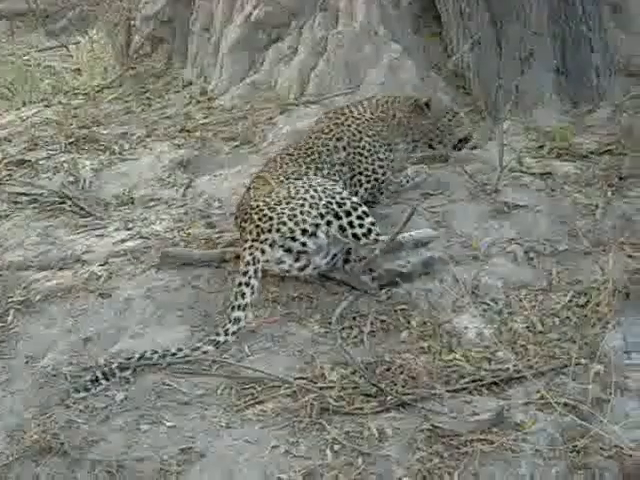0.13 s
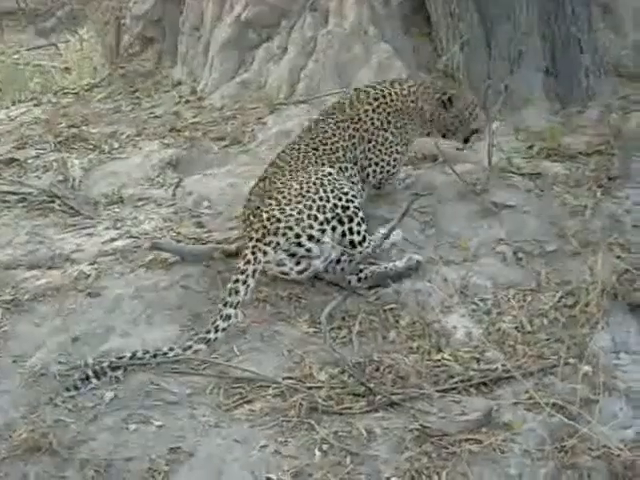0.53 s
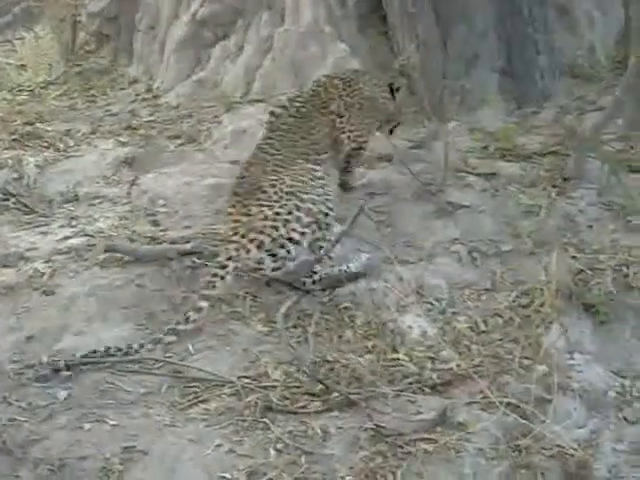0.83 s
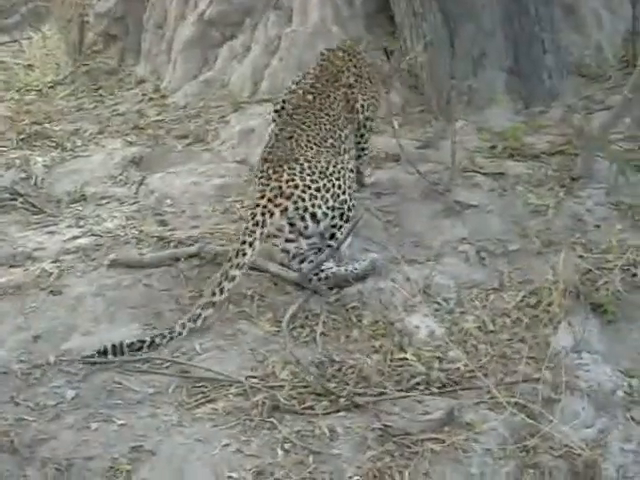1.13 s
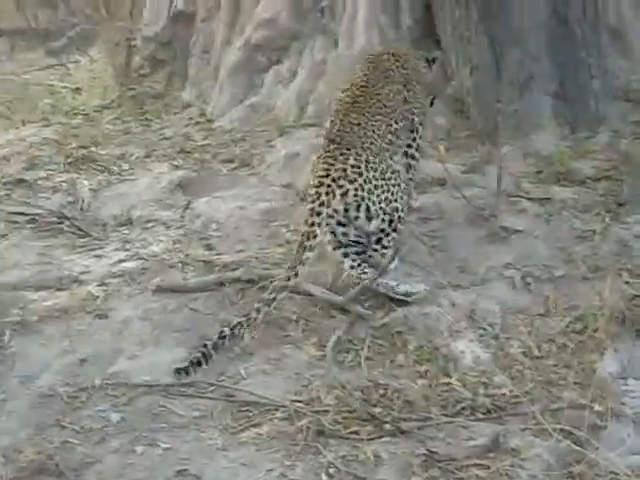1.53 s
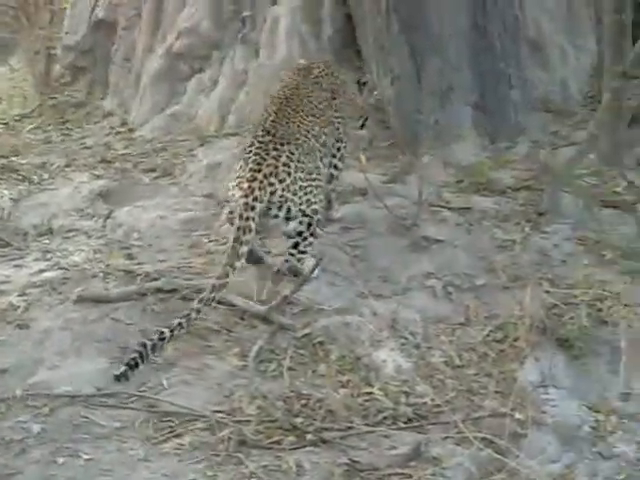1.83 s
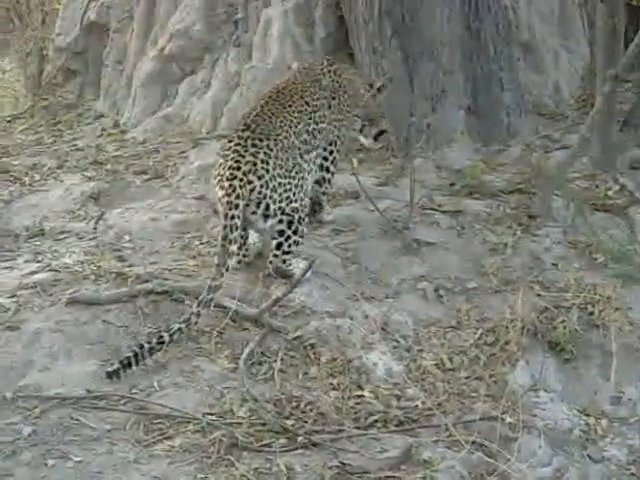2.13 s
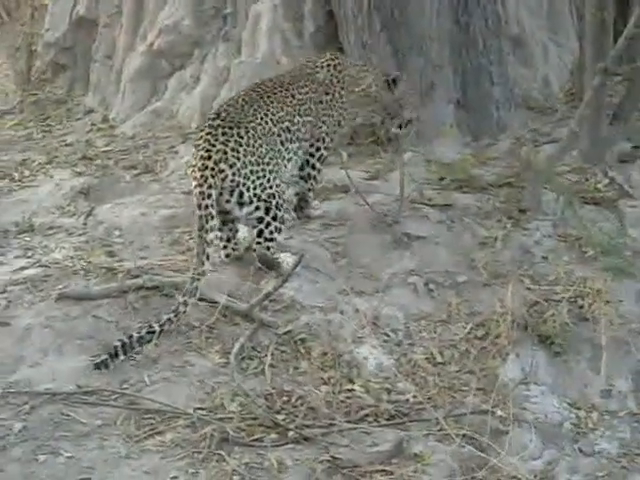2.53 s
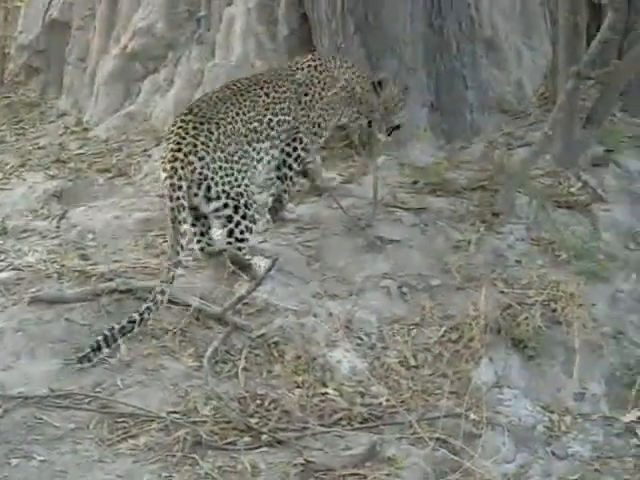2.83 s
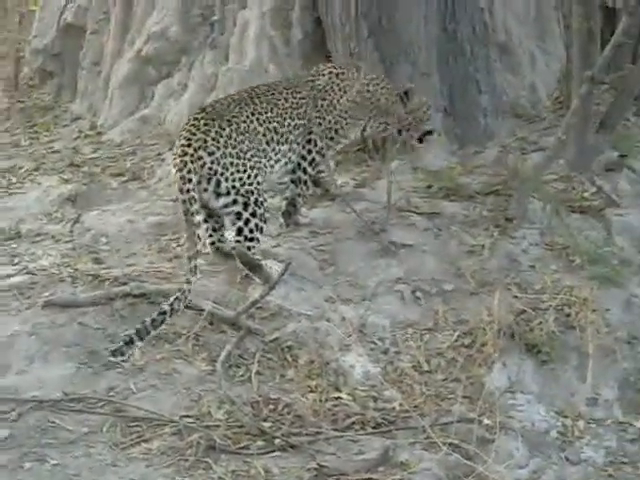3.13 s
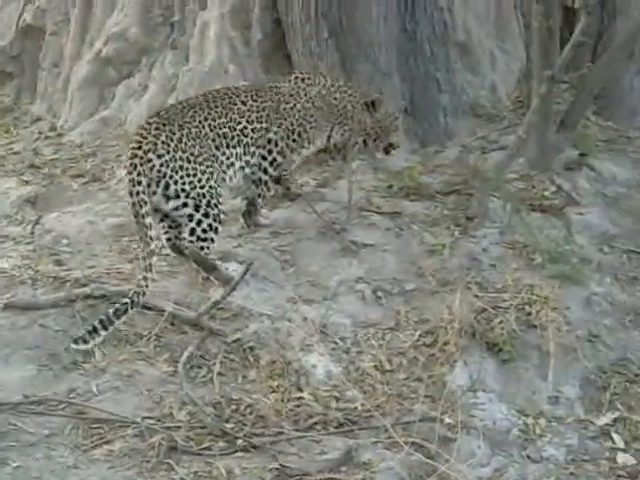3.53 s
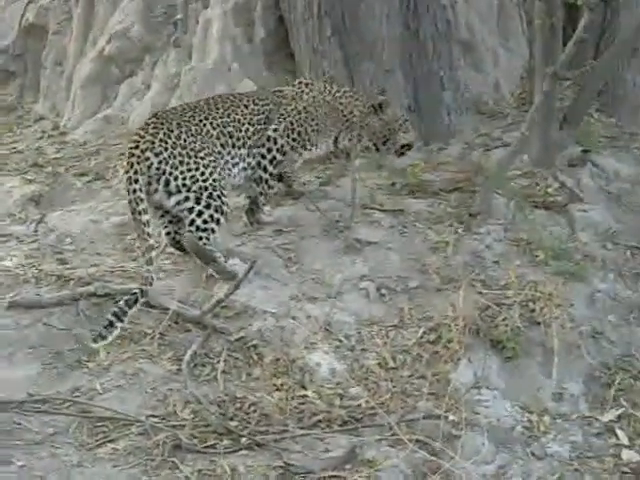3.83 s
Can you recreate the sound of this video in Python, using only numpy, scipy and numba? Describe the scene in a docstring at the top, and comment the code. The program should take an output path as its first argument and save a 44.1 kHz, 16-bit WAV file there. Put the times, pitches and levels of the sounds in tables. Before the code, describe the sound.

A leopard's rasping, sawing call, harsh out-breaths and in-breaths alternating steadily in quiet open bush.

```python
"""Open bush, a leopard sawing near a tree trunk: rough out-breaths and in-breaths by turns.
Slack vocal folds flap about 48 times a second on out-breaths and about 32, unevenly, on in-breaths.
Each flap is a click with a puff of noise after it; both ring drifting band-pass throat resonances.
Harsh rasps, lingering breath hiss and rumble, and decaying-noise echoes of trunk and far bush are added.
A narrow band cuts the treble and the strongest peaks are clipped."""
import sys
import numpy as np
from scipy import signal
from scipy.fft import rfft, irfft
from scipy.io import wavfile
from scipy.ndimage import uniform_filter1d
from numba import njit

SR = 44100
rng = np.random.default_rng(int(sys.argv[2]) if len(sys.argv) > 2 else 0)


def waveform_to_disk(signal):
    """Save audio, clipped to [-1, 1], as 16-bit WAV at the path in sys.argv[1]."""
    frames = np.transpose(np.atleast_2d(signal))
    scaled = np.clip(frames, -1, 1) * 32767
    samples = np.round(scaled).astype(np.int16)
    wavfile.write(sys.argv[1], SR, samples)


def undo_db(level):
    """Turn decibels back into plain size, where 20 dB means ten times bigger."""
    steps = np.asarray(level, float) / 20
    return 10 ** steps


N = 176400


def unit(x):
    """Scale to rms 1."""
    return x / np.sqrt(np.mean(x ** 2))


def coloured(points):
    """Noise of rms 1, its spectrum interpolated in dB over log frequency."""
    hz, db = np.array(points).T
    f = np.maximum(np.arange(N // 2 + 1) * SR / N, 1)
    gain = undo_db(np.interp(np.log(f), np.log(hz), db))
    return unit(irfft(rfft(rng.standard_normal(N)) * gain, N))


def walk(rate):
    """Slow random drift of rms 1: held draws, rate per second, smoothed twice."""
    k = int(SR / rate)
    held = np.repeat(rng.standard_normal(N // k + 1), k)
    return unit(uniform_filter1d(uniform_filter1d(held, k), k)[:N])


@njit
def resonance(x, hz, width, widen):
    """State-variable band-pass with a moving centre; widen damps its ringing."""
    y, b, l = np.empty(len(x)), 0., 0.
    for i in range(len(x)):
        g = np.tan(np.pi * hz[i] / SR)
        k = width * widen[i] / hz[i]
        v = (b + g * (x[i] - l)) / (1 + g * (g + k))
        b, l = 2 * v - b, l + 2 * g * v
        y[i] = v * width / hz[i]
    return y


# Noise spectrum of the bush. Each row: frequency in Hz, relative density in dB per Hz.
BUSH_SPECTRUM = [(24, -31), (40, -1), (360, -8), (754, -2), (1230, -3), (3700, -3), (4810, -33),
                 (8140, -120)]
BUSH_DB = -52


def bush():
    """Quiet steady background: coloured noise."""
    return undo_db(BUSH_DB) * coloured(BUSH_SPECTRUM)


def echoes(cat):
    """Reflections as decaying noise from 8 ms on: the near tree trunk and the bush farther off."""
    t = np.arange(SR) / SR
    tail = 0
    for db, t60_s in ((-14, .2), (-17, .51)):  # trunk, far bush
        decay = rng.standard_normal(SR) * np.exp(-np.log(1000) * t / t60_s) * (t > .008)
        tail = tail + undo_db(db) * unit(decay)
    return signal.fftconvolve(cat, tail / np.sqrt(SR))[:N]


# Noise spectrum of the breath's low rumble. Each row: frequency in Hz, relative density in dB per Hz.
RUMBLE_SPECTRUM = [(25, -17.5), (50, -4), (80, -2.5), (130, -18.5), (300, -62.5)]
HISS_DB, RUMBLE_DB, HISS_LAG_S = -21.5, -22, .055


def breath_hiss(cat):
    """Open-mouth hiss and rumble: noise on the lagged voice envelope, lingering between strokes."""
    pole = np.exp(-1 / (HISS_LAG_S * SR))
    envelope = signal.lfilter([1 - pole], [1, -pole], np.abs(cat))
    return envelope * (undo_db(HISS_DB) * coloured(BUSH_SPECTRUM) + undo_db(RUMBLE_DB) * coloured(RUMBLE_SPECTRUM))


# Single harsh rasps. Each row: start in seconds, resonance in Hz, width in Hz, decay in seconds, level in dB.
RASP_EVENTS = [(0.375, 1107, 89.4, 0.019, -22), (0.698, 2550, 199.6, .015, -22.5),
               (1.04, 2630, 358, 0.011, -22), (1.73, 572, 200, 0.02, -27.5),
               (2.888, 2650, 241, 0.0078, -17.5), (2.929, 2420, 207, 0.0047, -22.5),
               (2.815, 1083, 120, 0.017, -24.5)]


def rasps():
    """Short puffs of air, each ringing one resonance that rises a little."""
    out, t = np.zeros(N + SR), np.arange(SR // 5) / SR
    for start, hz, width, decay, db in RASP_EVENTS:
        puff = rng.standard_normal(len(t)) * np.exp(-t / decay)
        rising_hz = hz * (1 + np.minimum(t, 2 * decay))
        ring = resonance(puff, rising_hz, 1. * width, np.ones(len(t)))
        i = int(start * SR)
        out[i:i + len(t)] += undo_db(db) * ring / np.std(ring[t < decay])
    return out[:N]


FIRST_FLAP, FIRM_S = .35, .04  # strength at the start; it gains 1 per FIRM_S up to a ceiling of 1
SETTLE_S, PUFF_S = .03, .007  # time constants of the slow start and of the puff's decay


def flaps(breaths, pace, slow_end, scatter, scatter_db):
    """Irregular fold closures: clicks, puff envelopes, progress 0-1 per row, band dB, time since a flap."""
    clicks, progress, balance = np.zeros(N), np.zeros(N), np.zeros((5, N))
    t = np.arange(N) / SR
    for (start, length, *db), (rate, slow) in zip(breaths, pace):
        s = 0.
        for late, size in rng.standard_normal((24, 2)):
            if s < length and start + s < N / SR:
                firmness = min(FIRST_FLAP + s / FIRM_S, 1)
                clicks[int((start + s) * SR)] = undo_db(scatter_db * size) / np.sqrt(rate) * firmness
            slowing = slow * np.exp(-s / SETTLE_S) + slow_end * (s / length) ** 3
            s += (1 + slowing + scatter * late) / rate
        on = t >= start - .03
        progress[on] = np.clip((t[on] - start) / length, 0, 1)
        balance[1, on] = db[0] + (db[1] - db[0]) * progress[on]
        balance[2, on] = db[2] + (db[3] - db[2]) * progress[on]
        balance[3, on], balance[4, on] = db[4:]
    pole = np.exp(-1 / (PUFF_S * SR))
    onset = signal.lfilter([1], [1, -pole ** 3], clicks)
    puffs = signal.lfilter([1], [1, -pole], onset)
    since_s = t - np.maximum.accumulate(t * (clicks > 0))
    return unit(clicks), unit(puffs), progress, balance, since_s


WANDER, WANDER_DB, WANDER_PER_S = .03, 2.5, 14  # rms drift of pitch (share) and strength, draws per s
ARCH_TOP = (.25, .572, .28)  # progress at which chest, mouth, treble resonances stand highest
OPENING_S = .009  # damping grows from 0.5 to 1.5 times this after a flap


def strokes(breaths, efforts, throat, air_db, leak, sags, flap, damp):
    """Flaps and air ring groups of drifting throat resonances; parting folds damp the upper ones."""
    t = np.arange(N) / SR
    clicks, puffs, progress, balance, since_s = flaps(breaths, *flap)
    parted = 1 + damp * np.clip(since_s / OPENING_S - .5, 0, 1)
    effort = 0
    for points in efforts:
        at_s, level_db = np.array(points).T
        effort = effort + undo_db(np.interp(t, at_s, level_db, -120, -120))
    effort = uniform_filter1d(effort, size=90)
    out = 0
    # kind: 0 chest, 1 mouth, 2 treble; the last two groups are second chest and low mouth
    for group, band_db, kind in zip(throat, balance, (0, 1, 2, 0, 1)):
        arch = 1 - 2 * np.abs(progress - ARCH_TOP[kind])
        widen = parted if kind else np.ones(N)
        moving = []
        for hz, width, db in group:
            moving_hz = hz * (1 + sags[kind] * (arch - .4) + WANDER * walk(WANDER_PER_S))
            gain = undo_db(db + WANDER_DB * walk(WANDER_PER_S)) / np.sqrt(width)
            moving.append((moving_hz, 1. * width, gain))

        def ring(x):
            """Sum the group's resonances with alternating sign."""
            return sum((-1) ** k * g * resonance(x, hz, w, widen) for k, (hz, w, g) in enumerate(moving))

        air = unit((puffs + leak[kind]) * rng.standard_normal(N))
        source = clicks + undo_db(air_db[kind]) * air
        loudness = np.std(ring(source)[effort > effort.max() / 30])
        out = out + ring(effort * undo_db(band_db) * source) / loudness
    return out


# In-breath stretches; the first two rows are one breath, slower then faster flapping.
# Each row: first flap in seconds, length in seconds, mouth band early and late in dB,
# treble early and late in dB, second chest resonance in dB, low mouth resonance in dB; all against the chest.
IN_STRETCHES = [(.299, 0.11, -8.5, 6, -7.5, -17, -5, -15), (.439, 0.18, 1.5, 11.5, -10, -14.5, -6.5, -13),
                (.870, 0.26, -3, -9, -6.5, -17.5, -10.5, -28),
                (1.485, 0.74, -18.5, -13.5, -10.5, -25, -13, -23.5),
                (2.076, 0.43, -16, -2.5, -19, -13, -17, -33), (2.744, 0.3, -3.5, -8, -15, -19, -19, -25.5),
                (3.379, 0.24, -11.5, -7, -11.5, -17.5, -17.5, -26.5)]
# Chest effort, one list per breath. Each row: time in seconds, level in dB.
IN_EFFORTS = [
    [(0.27, -24), (0.355, -26), (0.374, -20), (0.41, -13), (0.474, -17.5), (0.542, -26), (0.57, -64.5)],
    [(0.855, -31.5), (0.869, -24.5), (0.899, -26.5), (1.055, -15.5), (1.111, -18), (1.157, -32),
     (1.165, -46)],
    [(1.47, -20), (1.508, -22.5), (1.538, -17.5), (1.55, -20.5), (1.656, -12), (1.696, -15.5),
     (1.765, -35.5)],
    [(2.06, -38.5), (2.068, -21.5), (2.098, -22), (2.282, -13), (2.32, -23), (2.35, -27.5), (2.375, -58.5)],
    [(2.715, -39.5), (2.727, -26.5), (2.745, -20.5), (2.799, -17.5), (2.929, -11), (2.989, -23.5),
     (3.035, -47.5)],
    [(3.36, -24.5), (3.412, -21.5), (3.438, -23), (3.49, -14.5), (3.622, -16.5), (3.672, -33), (3.685, -62)],
]
# Chest, mouth and treble groups. Each row: resonance in Hz, width in Hz, relative level in dB.
IN_RESONANCES = ([(88.6, 33, -0.5), (184, 18.3, 6)], [(745.4, 24.3, 3.5), (1032, 35, -4), (1135, 8.3, -3)],
                 [(1784, 8.7, 0), (2155, 21, 0.5), (2650, 120, 3.5), (3005, 17, -3.5), (3290, 210, -7)])
# One row per stretch. Each row: flaps per second before slowing, share by which the start is slower.
IN_PACES = [(27, 0), (34.7, 0), (32.7, 0), (32, 0), (29.5, 0), (29.5, 0), (34.5, 0)]


def in_breaths():
    """Slow uneven flapping on indrawn air, with much noise in the treble."""
    throat = IN_RESONANCES + ([(365, 28, 0)], [(560, 60, 0)])  # second chest, low mouth
    return strokes(IN_STRETCHES, IN_EFFORTS, throat,
                   air_db=(1, 2, 14), leak=(1.5, .86, .6),  # air against clicks, leak between puffs
                   sags=(.026, .028, .012),  # pitch arch, share
                   flap=(IN_PACES, 0., .04, 3.),  # end slowing, period scatter, strength scatter dB
                   damp=1.)


# Out-breaths. Each row: first flap in seconds, length in seconds, mouth band early and late in dB,
# treble early and late in dB, second chest resonance in dB, low mouth resonance in dB; all against the chest.
OUT_BREATHS = [(.140, 0.072, 10, -4.5, -7.5, -4.5, -15, -9), (.598, 0.21, 3.5, 5, -11.5, -6, -15, -7.5),
               (1.186, 0.23, 3, -16, -5.5, -15, -27, -21.5), (1.781, 0.2, -13, -5, -8.5, -8, -14, -10),
               (2.400, 0.27, -0.5, -4.5, -10, -10.5, -22.5, -21.5),
               (3.054, 0.25, 2, -3, -8, -9.5, -21, -13.5), (3.704, 0.24, 4.5, 1, -10.5, -8, -19, -12.5)]
# Chest effort, one list per breath. Each row: time in seconds, level in dB.
OUT_EFFORTS = [
    [(0.135, -13), (0.153, -12), (0.199, -26.5), (0.237, -28.5), (0.251, -51), (0.265, -19.5)],
    [(0.575, -25.5), (0.589, -17), (0.625, -15.5), (0.745, -17), (0.823, -24.5), (0.85, -61)],
    [(1.17, -14), (1.184, -24.5), (1.218, -12.5), (1.362, -13.5), (1.43, -30.5), (1.465, -24)],
    [(1.77, -17.5), (1.806, -13.5), (1.856, -9.5), (1.974, -16.5), (2.008, -24), (2.055, -41)],
    [(2.38, -32), (2.394, -19.5), (2.434, -9), (2.608, -15), (2.684, -35), (2.71, -66)],
    [(3.04, -44), (3.05, -25.5), (3.084, -11), (3.154, -12), (3.304, -20), (3.355, -61)],
    [(3.69, -30), (3.72, -16), (3.754, -14.5), (3.804, -11), (3.924, -16.5), (4.0, -32)],
]
# Chest, mouth and treble groups. Each row: resonance in Hz, width in Hz, relative level in dB.
OUT_RESONANCES = ([(88, 140, -2), (200.6, 25.5, 4)], [(784.6, 30.6, 10), (1021, 34, 3.5), (1175, 9, -8.5)],
                  [(1552, 10, -3.5), (1800, 13, -5), (2002, 13, -2), (2356, 26, 2), (2730, 130, 0),
                  (3110, 68, -8), (3397, 40, -5.5)])
# Each row: flaps per second before slowing, share by which the start is slower.
OUT_PACES = [(55, .3), (50.5, .15), (45.5, .3), (48, .25), (47.5, .1), (48, .5), (49, .33)]


def out_breaths():
    """Faster, steadier flapping on outgoing air, slowing towards the end of the breath."""
    throat = OUT_RESONANCES + ([(368, 50, 0)], [(600, 55, 0)])  # second chest, low mouth
    return strokes(OUT_BREATHS, OUT_EFFORTS, throat,
                   air_db=(-4, -2.5, 12), leak=(.5, .5, 1.3),
                   sags=(.17, .097, .036),
                   flap=(OUT_PACES, .15, .015, 1.5),
                   damp=1.8)


def scene():
    """The leopard, its hiss, its near and far echoes and the quiet bush."""
    cat = out_breaths() + in_breaths() + rasps()
    cat = signal.sosfilt(signal.butter(2, 80, "high", fs=SR, output="sos"), cat)
    return (cat + breath_hiss(cat) + echoes(cat) + bush())[None]


def roll_off(x):
    """The treble ends steeply here."""
    return signal.sosfilt(signal.butter(12, 16340, fs=SR, output="sos"), x)


OPENS_S, BAND_TOP_HZ = .076, 3650
OVERLOAD, CLIP = .61, .71  # peak limits: preamplifier, finished mix
MIRROR_DB = -17  # gain of the 8 kHz product


def record(dry):
    """Late fade-in, saturating preamplifier, narrow band, faint mirror of its top above 4 kHz, clipping."""
    t = np.arange(N) / SR
    x = dry * np.clip((t - OPENS_S) / .015, 0, 1)
    x = signal.sosfilt(signal.butter(2, 30, "high", fs=SR, output="sos"), x)
    x = np.clip(x, -OVERLOAD, OVERLOAD)
    x = signal.sosfilt(signal.ellip(14, .3, 100, BAND_TOP_HZ, fs=SR, output="sos"), x)
    mirror = x * np.cos(2 * np.pi * 8000 * t)
    mirror = signal.sosfilt(signal.butter(3, [4340, 4420], "band", fs=SR, output="sos"), mirror)
    mix = np.clip(x + undo_db(MIRROR_DB) * mirror, -CLIP, CLIP)
    return roll_off(mix)


dry = scene()
out = record(dry)
waveform_to_disk(out)
```